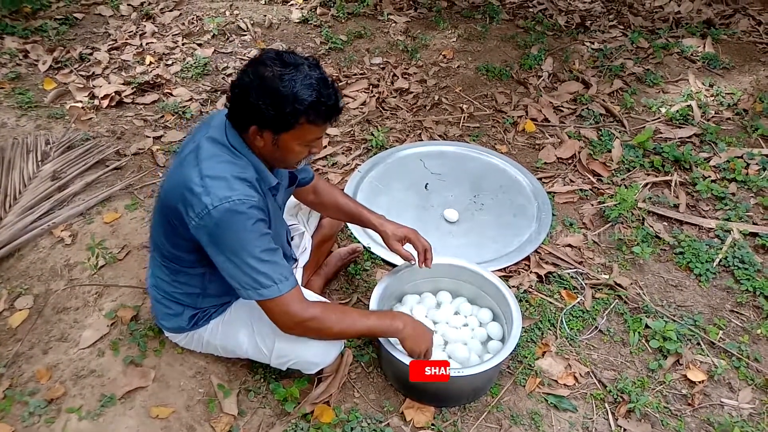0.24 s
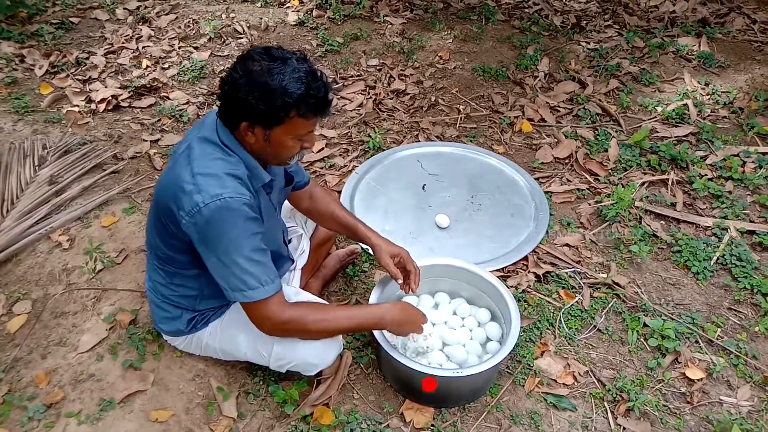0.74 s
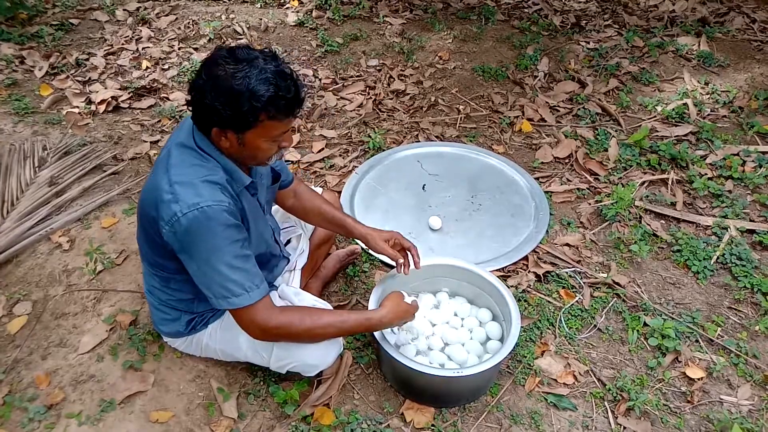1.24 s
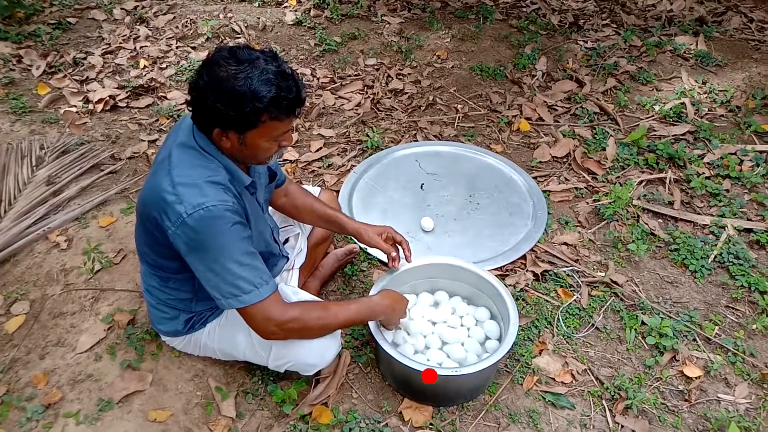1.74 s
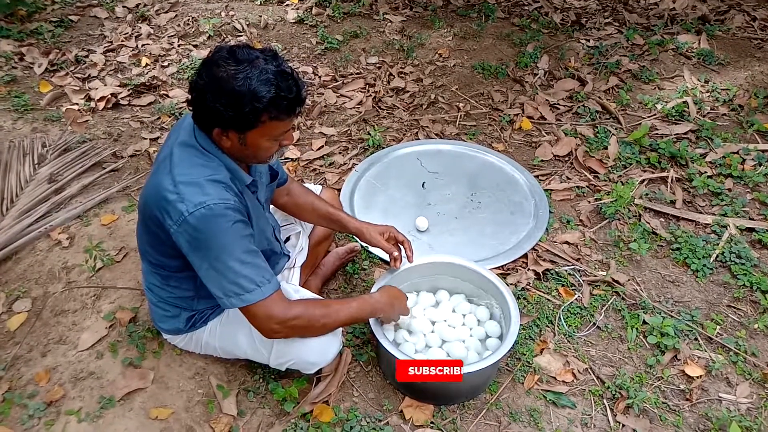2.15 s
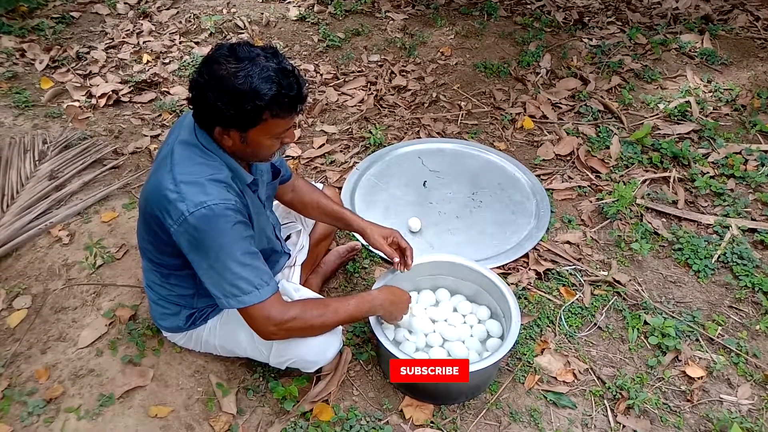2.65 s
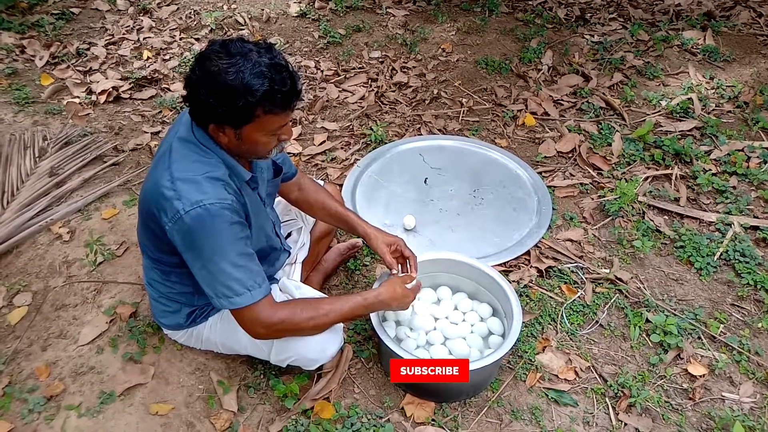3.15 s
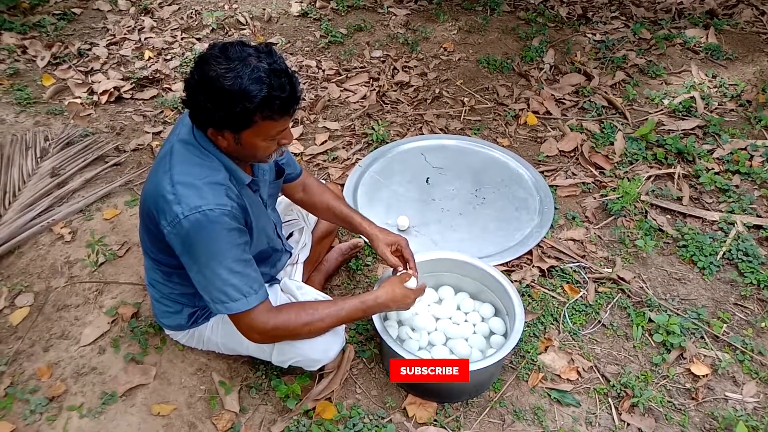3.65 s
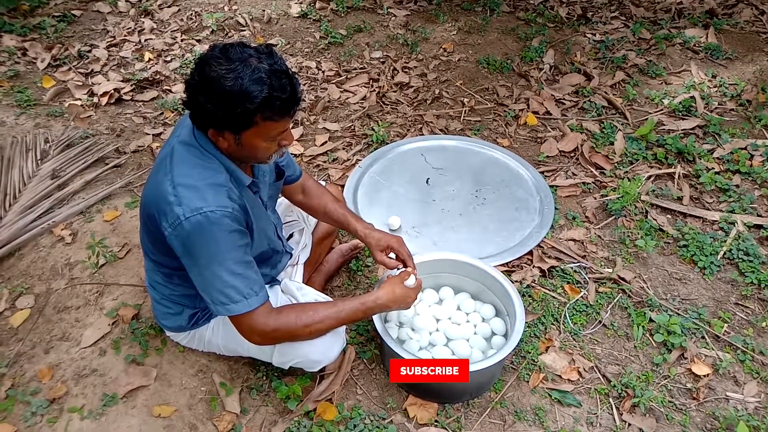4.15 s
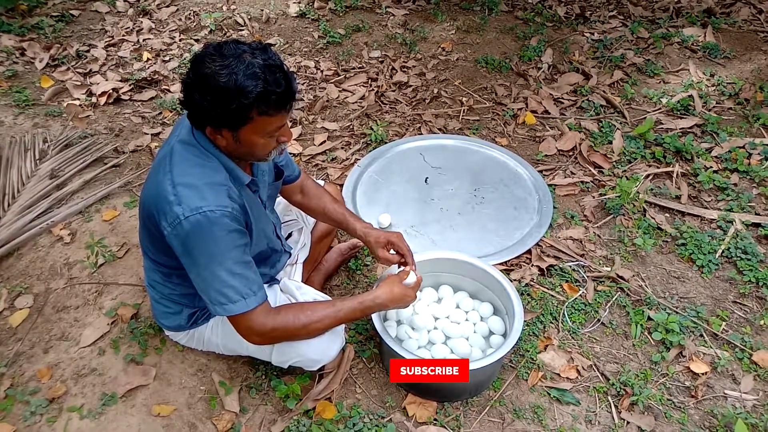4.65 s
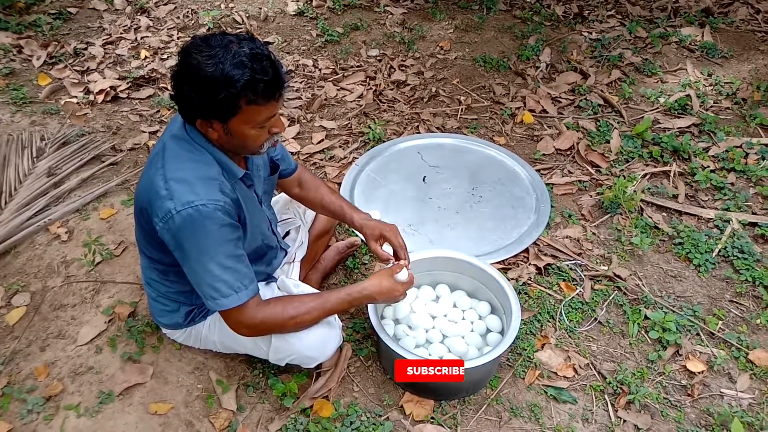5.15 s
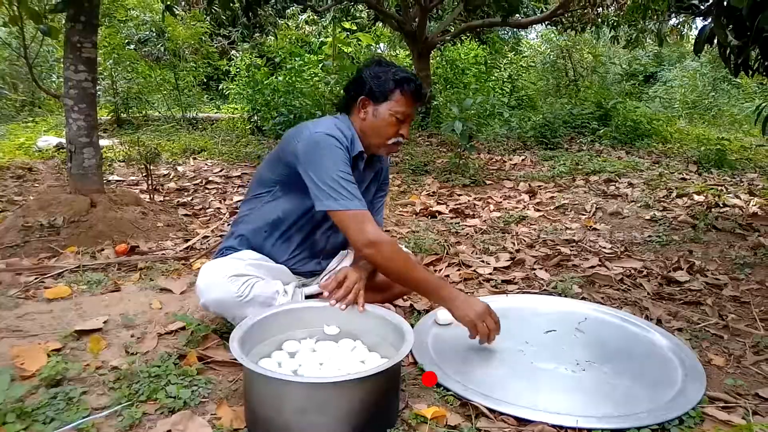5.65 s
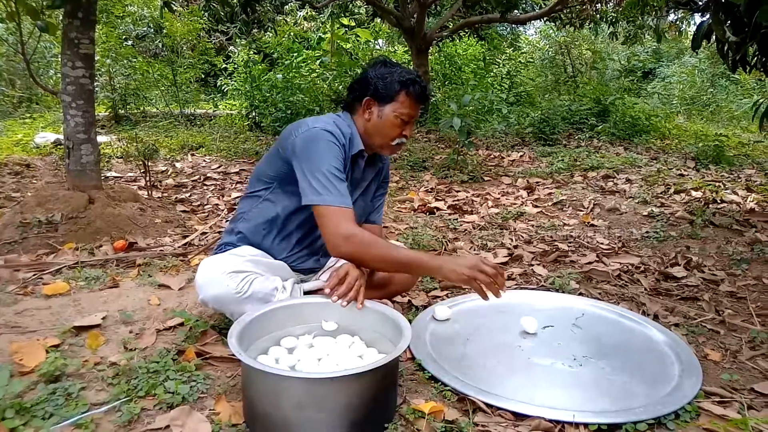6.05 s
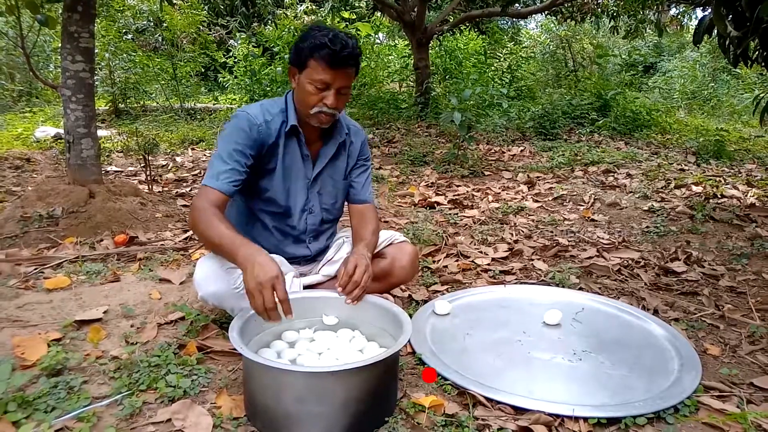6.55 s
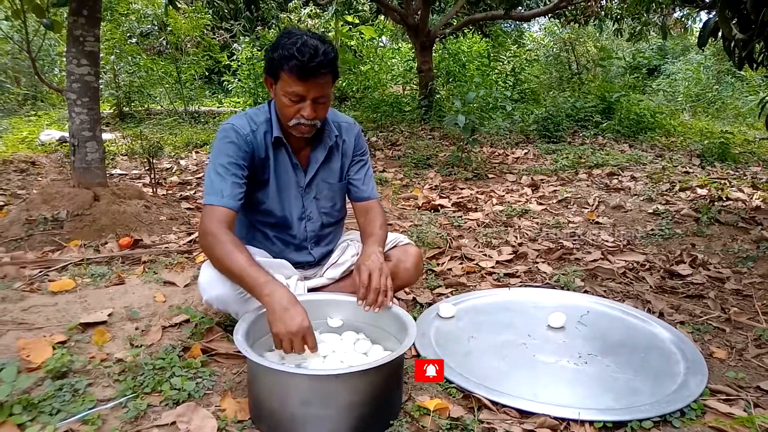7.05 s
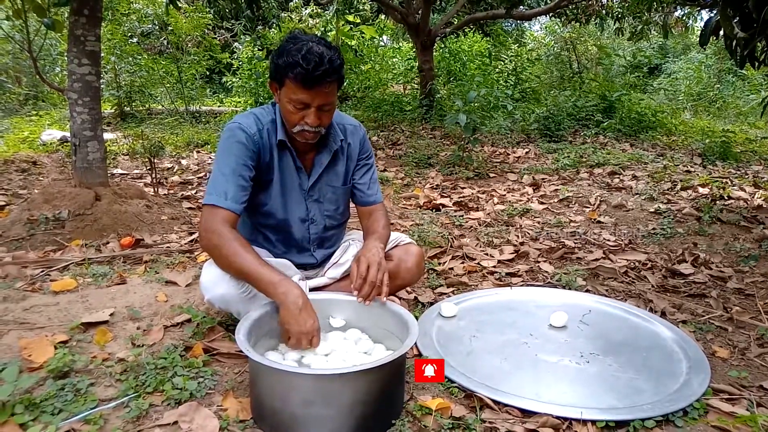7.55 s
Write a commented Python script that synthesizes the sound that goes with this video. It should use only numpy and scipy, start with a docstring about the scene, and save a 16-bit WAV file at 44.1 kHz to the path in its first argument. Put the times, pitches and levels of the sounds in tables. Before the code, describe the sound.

A metallic crash and a short rattle come from a steel pot in a grove. Insects and leaves hiss steadily while a distant bird repeats a high three-step call. Close by, eggs tap the rim, bits of shell snap off and water is flicked from fingers. Three more loud blows ring the pot, the last stopping dead. Finally, wet eggs slide and knock together. The sound is nearly mono.

```python
"""A crash and a short rattle open the scene: boiled eggs handled in a steel pot of water, in a grove.
A bird repeats a three-step call over a hiss of insects and leaves; faint tones come and go. Shells snap,
eggs tap the rim, water flicks off fingers, and loud blows ring the steel and scatter among the trees.
The last blow stops dead; then wet eggs slide and knock together. The image is nearly mono."""
import sys
import numpy as np
from scipy import signal
from scipy.fft import rfft, irfft, next_fast_len
from scipy.io import wavfile
from scipy.ndimage import uniform_filter1d, map_coordinates

SR = 44100
rng = np.random.default_rng(int(sys.argv[2]) if len(sys.argv) > 2 else 0)


def store_wav(level_fs):
    """Save 16-bit WAV to argv[1]."""
    pcm = np.round(np.clip(np.atleast_2d(level_fs), -1, 1) * 32767)
    wavfile.write(sys.argv[1], SR, pcm.T.astype(np.int16))


N = 343980

# loud blows on the pot (time [s], level [dB], rise [s])
BLOWS = [(-.045, -21, .0012), (2.9809, -19, 0.0007), (3.7193, -21, .0008), (5.4163, -18, 0.004)]
# colour of the crash (frequency [Hz], level [dB])
CRASH_EQ = [(88, -55), (150, -46), (209, -24), (339, -9.5), (668, -30.5), (722, -23), (985, -16),
            (2060, -12.5), (2750, 0), (3220, -8), (3680, -4.5), (4470, -8), (5640, -2), (9530, -15.5),
            (15500, -30)]
# decay among the trees, before stretching (frequency [Hz], t60 [s])
TREE_DECAY = [(150, 0.12), (400, 0.3), (1040, 0.3), (2760, .24), (7280, 0.39), (14000, 0.23)]
# a blow's bright steel, dull thud and lingering pot wall (frequency [Hz], level [dB], t60 [s])
STEEL_MODES = [(2680, -25, 0.057), (2936, 1, 0.19), (3860, -1, 0.2), (4440, -8, 0.2), (5100, -8, 0.3),
               (5572, -7, 0.3), (5674, 2, 0.27), (5750, -14, 0.2), (6500, 2, 0.25), (6686, -10, 0.15),
               (6560, 1, 0.32), (7130, -3.5, 0.31), (7700, -7, 0.3), (8400, -8, 0.23)]
THUD_MODES = [(265, -4, 0.041), (336, -1.5, 0.046), (473, -18.5, 0.091), (990, -2, 0.03), (1258, -1, 0.026),
              (2603, 0.5, 0.048)]
WALL_MODES = [(380, -9, 1.36), (795, 2, 0.48)]
# faders of the grove bed (time [s], leaves [dB], twitter [dB], rumble [dB])
GROVE_FADERS = [(0.2, -50, -53.5, -73.5), (0.9, -50.5, -64, -67), (1.45, -48.5, -59, -70),
                (2.02, -53.5, -58.5, -64.5), (2.32, -54.5, -63.5, -65), (3.69, -49, -59, -66.5),
                (4.2, -51, -58.5, -70), (4.73, -51, -55, -58.5), (5.11, -51, -59.5, -69),
                (5.64, -51.5, -65, -63.5), (7.16, -51, -65.5, -68.5), (7.48, -51, -62, -67),
                (7.8, -52.5, -62, -71)]
# colours of insects, leaves, far twitter and rumble (frequency [Hz], level [dB])
INSECT_EQ = [(3600, -31), (4300, -19.5), (4750, -7.5), (5050, -1), (6000, -1), (7150, -1.5), (7700, -9),
             (8300, -11), (10400, -12.5), (12400, -22.5), (15500, -26)]
LEAF_EQ = [(200, -20.5), (300, -19), (500, -21), (900, -24), (1600, -24), (2300, -9), (2700, -1.5),
           (3200, 0), (3700, 1.5), (4000, -2.5), (4500, -3.5), (5500, -44)]
TWITTER_EQ = [(500, -88), (900, -16), (1150, -11.5), (1400, -5), (1900, 2), (2400, -1.5), (2800, 0),
              (3500, -49)]
RUMBLE_EQ = [(40, -54), (62, 5), (90, 3), (130, -7), (200, -15.5), (240, -15.5), (350, -23.5), (500, -69)]
# steady low tones (frequency [Hz], level [dB])
HUM = [(50, -72.5), (231, -78)]
# soft hollow bumps (time [s], level [dB], frequency [Hz])
BUMPS = [(0.033, -37.5, 365), (.117, -37, 340), (2.597, -56, 613), (4.497, -48.5, 321), (7.58, -50.5, 720),
         (7.334, -49, 295)]
# bird calls (end of slide [s], low note [Hz], low level [dB], high note [Hz], high level [dB])
CALLS = [(.606, 5624, -37, 6280, -37.5), (.946, 5610, -38.5, 6240, -40.5), (1.272, 5500, -42, 6370, -40.5),
         (1.606, 5030, -46, 6500, -41.5), (1.932, 5500, -44.5, 6200, -44), (2.27, 5500, -45.5, 6350, -43),
         (2.607, 5440, -46.5, 6200, -43.5), (2.948, 5250, -50, 6180, -46), (3.282, 5460, -43, 6310, -40),
         (3.65, 5290, -45, 6320, -59), (3.982, 5500, -45, 6200, -45), (4.332, 5350, -50.5, 6070, -46),
         (4.695, 5380, -45.5, 6280, -44), (5.036, 5390, -47.5, 6250, -44.5)]
# thin high pips (time [s], pitch [Hz], level [dB])
PIPS = [(.695, 7060, -49), (1.036, 6920, -46.5), (2.514, 7360, -45.5), (5.33, 7240, -45.5),
        (5.931, 7400, -51)]
# faint glides (start [s], end [s], start pitch [Hz], end pitch [Hz], level [dB])
TONES = [(1.2, 2.25, 152, 149.6, -69.5), (1.278, 1.368, 770, 814, -66), (1.49, 1.58, 820, 790, -60.5),
         (1.89, 2.094, 1100, 1060, -70), (2.575, 2.7, 984, 1000, -60), (2.712, 2.78, 985, 980, -63.5),
         (3.498, 3.658, 660, 627, -68.5), (4.191, 4.85, 232, 228.5, -55), (4.454, 4.6, 990, 980, -72),
         (4.632, 4.836, 970, 985, -63), (4.759, 4.904, 110, 157, -52.5), (5.929, 6.177, 895, 874, -66)]
# flakes of shell snapping off (time [s], level [dB], tilt [dB/octave])
SNAPS = [(1.438, -42, 5), (1.5054, -45, 14), (1.546, -45, 10), (2.482, -29, 0), (2.6555, -32.5, 2.5),
         (3.1387, -39.5, 6), (3.5942, -40.5, 10), (4.202, -44, 12), (4.5405, -41, 2.5), (5.36, -40.5, -8)]
# colour of breaking shell (frequency [Hz], level [dB])
SHELL_EQ = [(500, -35), (1100, -18), (2200, 2), (3100, 2.5), (4400, -9.5), (6200, 0.5), (8200, -13.5),
            (10000, -6.5), (15500, -36)]
# egg taps on the rim (time [s], level [dB], pitch [ratio])
TAPS = [(1.7414, -28.5, 1.001), (1.9209, -31, .86)]
# ring of a cracked shell and of a whole egg (frequency [Hz], level [dB], t60 [s])
CRACKED_MODES = [(1286, -6, 0.039), (2286, 3.5, 0.031), (3240, 1.5, 0.029), (3860, -1, 0.028),
                 (4670, -1, 0.027), (6800, 3, 0.036)]
EGG_MODES = [(307, -34, 0.05), (1002, -11, 0.066), (1265, 5, 0.034), (1876, -6, 0.047), (2530, -1.5, 0.032),
             (3020, -14, .035)]
# faders of flicked water and of sliding eggs (time [s], level [dB])
SPRAY_FADER = [(2.45, -59), (2.48, -41), (2.52, -41), (2.56, -54), (2.62, -48), (2.68, -62), (2.72, -80)]
SLIDE_FADER = [(7.12, -84), (7.18, -59), (7.3, -66), (7.34, -49), (7.52, -59.5), (7.6, -54), (7.66, -72),
               (7.72, -55), (7.8, -65)]
# colour of the spray (frequency [Hz], level [dB])
SPRAY_EQ = [(1500, -27), (3000, 1), (6000, -8), (10000, -3), (13000, -13), (15500, -14)]
# eggs knocking in the water (time [s], level [dB], overtone tilt [dB/octave])
KNOCKS = [(7.159, -28.5, 2.5), (7.3358, -43, -5), (7.3489, -36, -13), (7.3803, -48, 13),
          (7.4136, -39.5, -8.5), (7.453, -45, -3), (7.4687, -25.5, -1), (7.5688, -26.5, -4),
          (7.5884, -41, 11), (7.7202, -51, 11)]
# stereo side signal against the mid (frequency [Hz], level [dB])
SIDE_EQ = [(60, -44), (200, -61), (500, -31), (1200, -18.5), (2400, -27), (5000, -53.5), (8000, -69),
           (13000, -24)]

CUT_S = 5.4702  # the last blow stops dead and the insects drop slightly


def amp(db):
    """dB to gain."""
    return 10 ** (np.asarray(db) / 20)


def unit(x):
    """Scaled to rms 1."""
    return x / np.sqrt(np.mean(x ** 2) + 1e-20)


def along(points, hz):
    """Reads (frequency, value) points on a log axis."""
    f, v = np.transpose(points)
    return np.interp(np.log(hz + 1), np.log(f + 1), v)


def faders(rows):
    """One value per sample for each column after the time."""
    s, *columns = np.transpose(rows)
    return [np.interp(np.arange(N) / SR, s, c) for c in columns]


def add(track, s, sound):
    """Mixes a sound in at s seconds; what falls outside is dropped."""
    start = round(s * SR)
    sound = sound[max(-start, 0):N - start]
    track[max(start, 0):][:len(sound)] += sound


def wobble(rate, size=N):
    """A smooth random curve, rate knots a second."""
    knots = rng.standard_normal(int(size * rate / SR) + 4)
    return map_coordinates(knots, [np.arange(size) * rate / SR])


def rush(eq, patchy_db, patch=(8, 6)):
    """Noise of rms 1 with patches of random gain, sized in 43 Hz by 12 ms cells."""
    hz, _, z = signal.stft(rng.standard_normal(N), SR, nperseg=1024)
    patches = uniform_filter1d(rng.standard_normal(z.shape), patch[0], axis=0)
    patches = uniform_filter1d(patches, patch[1], axis=1)
    gain = amp(along(eq, hz)[:, None] + patchy_db * unit(patches))
    return unit(signal.istft(z * gain, nperseg=1024)[1][:N])


def burst(eq, stretch, tilt_db, size):
    """A noise hit whose every band dies at its own speed among the trees; tilt is per octave."""
    hz, t, z = signal.stft(rng.standard_normal(size), SR, nperseg=256)
    colour = unit(amp(along(eq, hz) + tilt_db * np.log2((hz + 50) / 4000)))
    t60 = stretch * along(TREE_DECAY, hz)[:, None]
    return signal.istft(z * colour[:, None] * amp(-60 * t / t60), nperseg=256)[1][:size]


def ring(modes, rise_s, spread_db=0, size=SR // 3, flutter=0):
    """Damped sines struck at strengths varying by spread_db; flutter mimics close modes beating."""
    t = np.arange(size) / SR
    out = np.zeros(size)
    for hz, db, t60 in modes:
        level_db = db + spread_db * rng.normal() + 4.3 * flutter * wobble(61, size) - 60 * t / t60
        out += amp(level_db) * np.sin(2 * np.pi * hz * t + flutter * wobble(109, size))
    return out * (1 - np.exp(-t / rise_s))


def crash(stretch, tilt_db=0):
    """A second of scattered noise; separate echoes make the tail lumpy."""
    return burst(CRASH_EQ, stretch, tilt_db, SR) * amp(1.17 * wobble(391, SR))


def blows():
    """A thud, ringing steel and a crash that swells as the echoes arrive; the pot wall rings on."""
    out, t = np.zeros(N), np.arange(SR) / SR
    for s, db, rise_s in BLOWS:
        echoes = crash(stretch=0.96) * (1 - np.exp(-t / rise_s))
        steel = amp(-12) * ring(STEEL_MODES, rise_s, spread_db=2.8, size=SR, flutter=1.3)
        thud = amp(-0.1) * ring(THUD_MODES, rise_s=0.0011, spread_db=1.0, size=SR)
        wall = amp(-33) * ring(WALL_MODES, rise_s=0.004, spread_db=0.58, size=SR)
        add(out, s, amp(db) * (echoes + steel + thud + wall) * (s + t < CUT_S))
    return out


def rattle():
    """The opening rattle: a drawn-out crash that dips and dies quickly, over the pot wall's ring."""
    out, t = np.zeros(N), np.arange(SR) / SR
    hold_s, release_t60_s = 0.173, 0.27
    gate = np.where(t < hold_s, 1, amp(-2 - 60 * (t - hold_s) / release_t60_s))
    clatter = amp(-33.5) * crash(stretch=15, tilt_db=0.49) * gate
    wall = amp(-50) * ring(WALL_MODES, rise_s=0.0059, spread_db=0.63, size=SR)
    add(out, 0, clatter + wall)
    return out


def grove():
    """The bed: insects, leaves, narrow streaks of far twitter, rumble and hum, each drifting alone."""
    t = np.arange(N) / SR
    leaf_db, twitter_db, rumble_db = faders(GROVE_FADERS)
    insect_db = np.where(t < CUT_S, -44.5, -45.5)
    insects = amp(insect_db + 0.17 * wobble(5.7)) * rush(INSECT_EQ, patchy_db=1.8)
    leaves = amp(leaf_db + 0.9 * wobble(7.7)) * rush(LEAF_EQ, patchy_db=2.1)
    twitter = amp(twitter_db + 2.2 * wobble(3.14)) * rush(TWITTER_EQ, patchy_db=7.0, patch=(2, 8))
    rumble = amp(rumble_db + 3.1 * wobble(5.0)) * rush(RUMBLE_EQ, patchy_db=1.5)
    hum = sum(amp(db + 0.71 * wobble(3.25)) * np.sin(2 * np.pi * hz * t) for hz, db in HUM)
    return insects + leaves + twitter + rumble + hum


def bumps():
    """Soft, hollow bumps close up: one damped low swing each."""
    out, t60_s = np.zeros(N), 0.1
    for s, db, hz in BUMPS:
        add(out, s, amp(db) * ring([(hz, 0, t60_s)], rise_s=0.0018))
    return out


def far(dry, wet_db, t60_s=0.25):
    """Distance: the direct sound and a fresh cloud of echoes, wet_db above it in energy."""
    t = np.arange(SR // 4) / SR
    out = signal.fftconvolve(dry, rng.standard_normal(len(t)) * amp(-60 * t / t60_s))
    out *= amp(wet_db) * np.linalg.norm(dry) / np.linalg.norm(out)
    out[:len(dry)] += dry
    return out


def bird_slide(low_hz, db, length_s):
    """A rough, distant whistle scooping up towards the low note."""
    start_hz = 3200
    u = np.linspace(0, 1, round(length_s * SR))
    hz = start_hz + (low_hz - start_hz) * (0.2 * u + 0.71 * u ** 5) + 190 * wobble(314, len(u))
    fade_in = amp(db) * np.minimum(4 * u, 1)
    return far(fade_in * np.sin(2 * np.pi * np.cumsum(hz) / SR), wet_db=2.5)


def bird_note(pitch_hz, db, length_s):
    """A distant whistle that starts sharp and sinks to pitch, breaking downwards in a fast rasp."""
    u = np.linspace(-1, 1, round(length_s * SR))
    sag = 0.0298 * (1 - u) / 2
    rasp = 0.1026 * np.tanh(0.324 * np.abs(wobble(381, len(u))) ** 3)
    hz = pitch_hz * (1 + sag - rasp)
    swell = amp(db + 2.04 * wobble(50.6, len(u))) * (1 - u ** 4)
    return far(swell * np.sin(2 * np.pi * np.cumsum(hz) / SR), wet_db=4.0)


def bird():
    """Each call slides up to a low note and steps to a high one; thin pips fall between."""
    out = np.zeros(N)
    slide_s, slide_fade_db_per_s = 0.062, 1.1
    for s, low_hz, low_db, high_hz, high_db in CALLS:
        add(out, s - slide_s, bird_slide(low_hz, -45 - slide_fade_db_per_s * s, slide_s))
        add(out, s - 0.008, bird_note(low_hz, low_db, length_s=0.06))
        add(out, s + 0.102, bird_note(high_hz, high_db, length_s=0.0823))
    for s, hz, db in PIPS:
        add(out, s, bird_note(hz, db, length_s=0.057))
    return out


def faint_tones():
    """Soft blurred tones that fade in and out: sines whose level and phase wander."""
    out = np.zeros(N)
    for start, end, from_hz, to_hz, db in TONES:
        u = np.linspace(0, 1, round((end - start) * SR))
        swell = amp(db + 4.5 * wobble(23.5, len(u))) * np.abs(np.sin(np.pi * u)) ** 0.41
        phase = 2 * np.pi * np.cumsum(from_hz + (to_hz - from_hz) * u) / SR
        blur = 0.046 * np.sqrt(from_hz) * wobble(33.8, len(u))
        add(out, start, swell * np.sin(phase + blur))
    return out


def crack(tilt_db, rise_s=0.0014, size=SR // 3):
    """Brittle shell: a short burst and its crackling tail."""
    t = np.arange(size) / SR
    crackle = amp(-12 + 2.8 * wobble(377, size))
    tail = crackle * burst(SHELL_EQ, stretch=0.91, tilt_db=tilt_db, size=size)
    click = burst(SHELL_EQ, stretch=0.26, tilt_db=tilt_db, size=size)
    return (click + tail) * (1 - np.exp(-t / rise_s))


def shell_snaps():
    """Flakes of shell snap off, each with its own brightness."""
    out = np.zeros(N)
    for s, db, tilt_db in SNAPS:
        add(out, s, amp(db) * crack(tilt_db))
    return out


def rim_taps():
    """An egg tapped on the rim: the shell cracks and rings briefly."""
    out, rise_s = np.zeros(N), 0.0022
    for s, db, pitch in TAPS:
        modes = [(hz * pitch, level, t60) for hz, level, t60 in CRACKED_MODES]
        shell = ring(modes, rise_s, spread_db=1.2)
        add(out, s, amp(db) * (shell + amp(1.5) * crack(tilt_db=1.5, rise_s=rise_s)))
    return out


def spray():
    """Water flicked off the fingers: a short, patchy fizz."""
    return amp(faders(SPRAY_FADER)[0]) * rush(SPRAY_EQ, patchy_db=2.5)


def thumps():
    """A close double thump: a short punch over a longer, deeper swing."""
    out = np.zeros(N)
    punch, body = (342, 7, 0.012), (149, -8.5, 0.076)  # (frequency [Hz], level [dB], t60 [s])
    for s, db in (5.361, -20), (5.3685, -26.5):
        add(out, s, amp(db) * ring([punch, body], rise_s=0.0018))
    return out


def egg_slides():
    """Wet eggs slide over each other; uneven slips ring their modes."""
    slips = rng.standard_normal(N) * amp(3.2 * wobble(90))
    egg = ring(EGG_MODES, rise_s=0.0013, size=4096)
    return amp(faders(SLIDE_FADER)[0]) * unit(signal.fftconvolve(slips, egg)[:N])


def egg_knocks():
    """Eggs collide in the water: their modes ring under a tick of shell on shell."""
    out = np.zeros(N)
    for s, db, tilt_db in KNOCKS:
        pitch = 1 + 0.021 * rng.normal()  # eggs differ a little in size
        modes = [(hz * pitch, level + tilt_db * np.log2(hz / 1265), t60) for hz, level, t60 in EGG_MODES]
        body = ring(modes, rise_s=0.0028, spread_db=2.0)
        tick = amp(-9) * crack(tilt_db=-1.8)
        add(out, s, amp(db) * (body + tick))
    return out


def scene():
    """A mono mix, widened by a faint phase-blurred copy as the side signal."""
    low_cut = signal.butter(4, 200, "high", fs=SR, output="sos")  # the pot is too small to radiate bass
    mid = grove() + signal.sosfilt(low_cut, blows() + rattle())
    mid += bumps() + bird() + faint_tones() + shell_snaps() + rim_taps()
    mid += spray() + thumps() + egg_slides() + egg_knocks()
    hz, _, z = signal.stft(mid, SR, nperseg=512)
    blur = np.exp(2j * np.pi * rng.random(z.shape)) * amp(along(SIDE_EQ, hz)[:, None])
    side = signal.istft(z * blur, nperseg=512)[1][:N]
    return np.array([mid + side, mid - side])


def record(dry):
    """The microphone rolls off the deep bass; a brick-wall filter takes off the top."""
    bass_hz, top_hz = 42, 15600
    size = next_fast_len(N + 4096)
    hz = np.fft.rfftfreq(size, 1 / SR)
    response = (hz < top_hz) * hz ** 4 / (hz ** 4 + bass_hz ** 4)
    return irfft(rfft(dry, size) * response, size)[:, :N]


dry = scene()
out = record(dry)
store_wav(out)
```